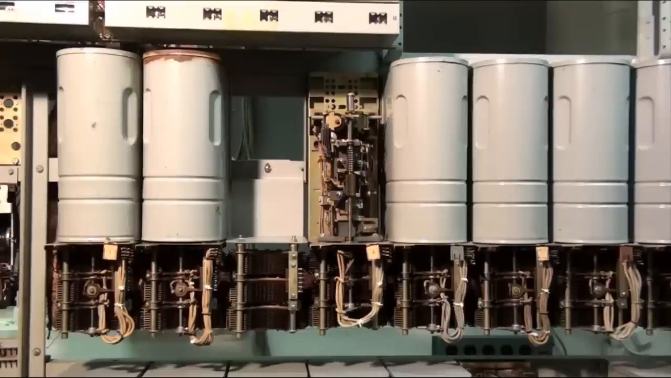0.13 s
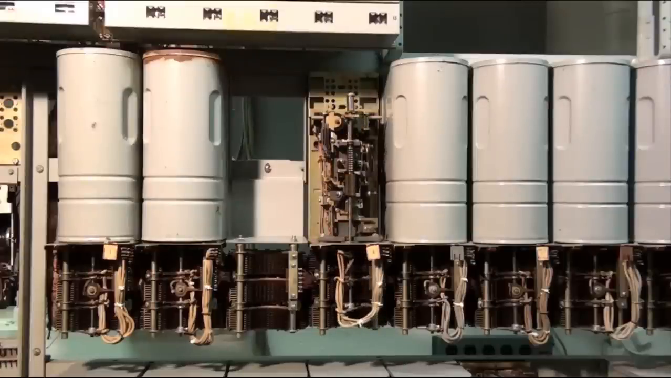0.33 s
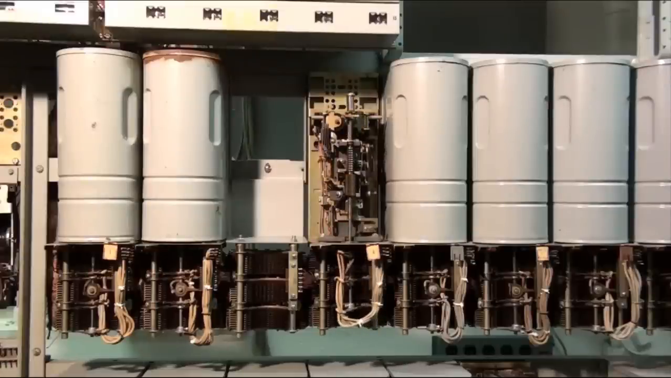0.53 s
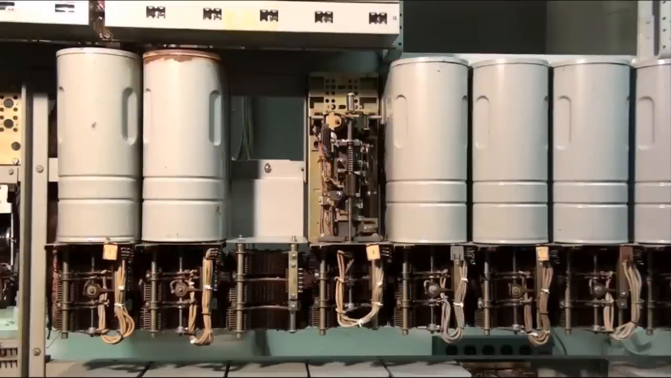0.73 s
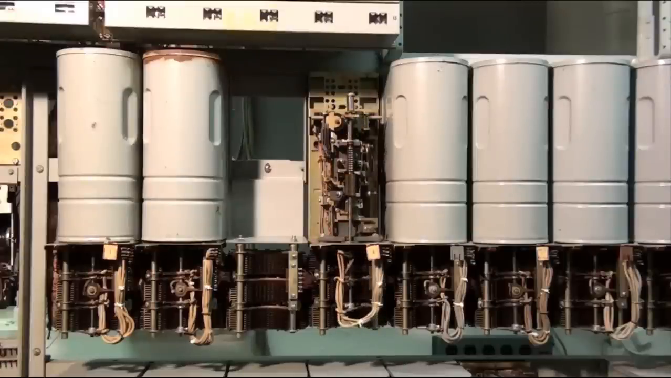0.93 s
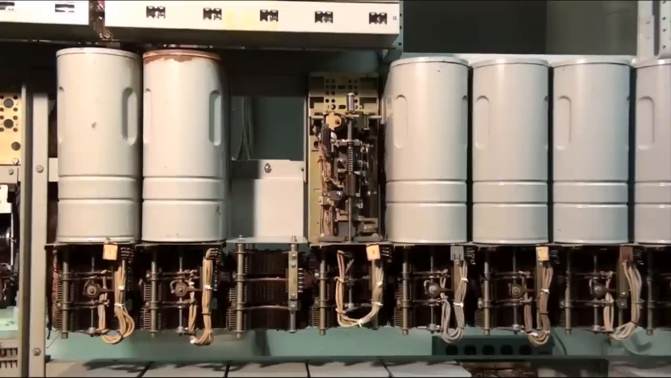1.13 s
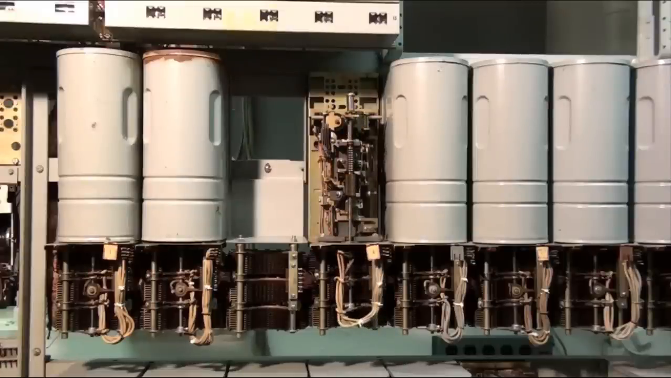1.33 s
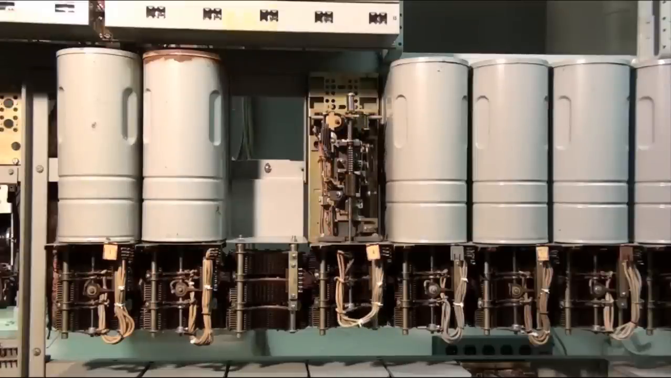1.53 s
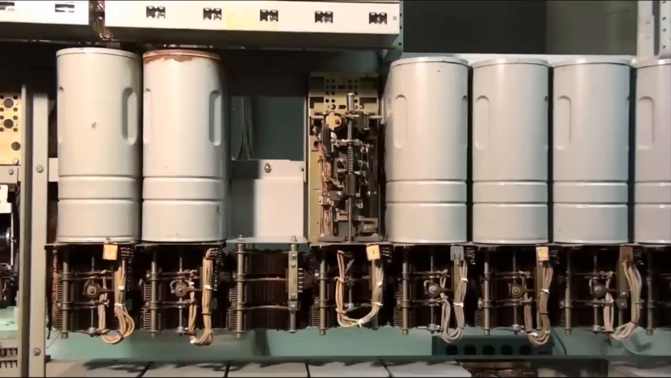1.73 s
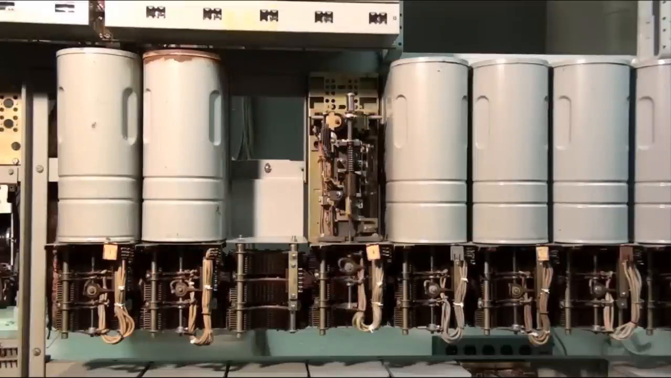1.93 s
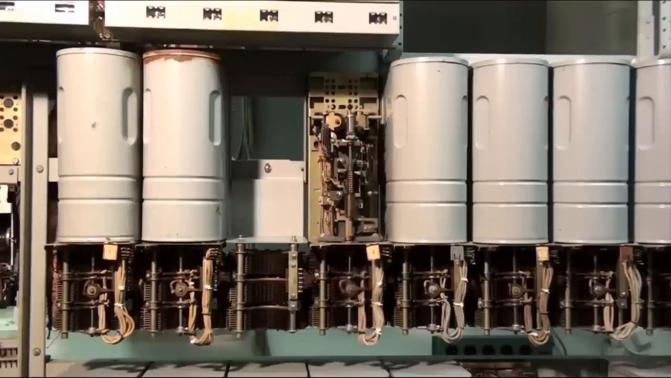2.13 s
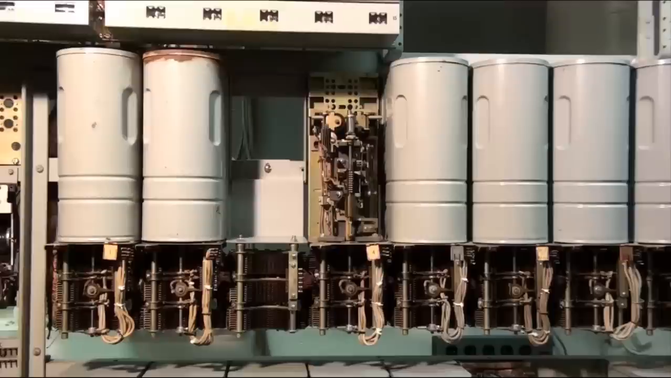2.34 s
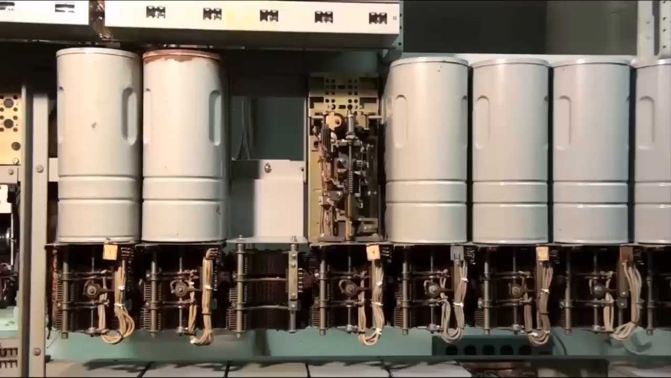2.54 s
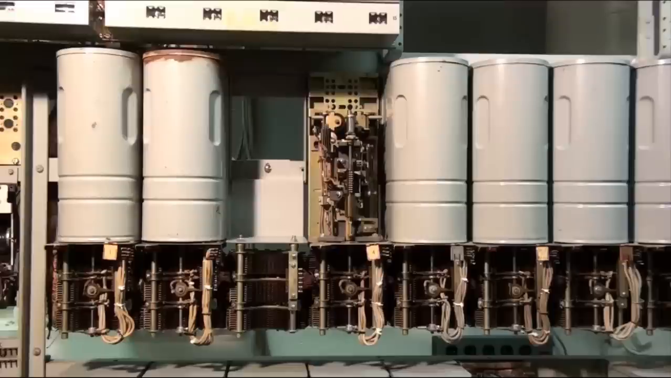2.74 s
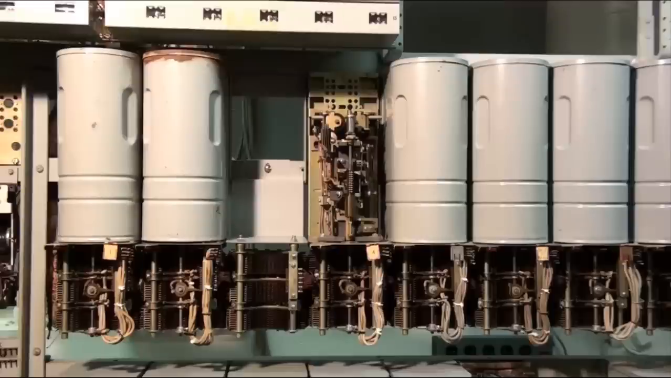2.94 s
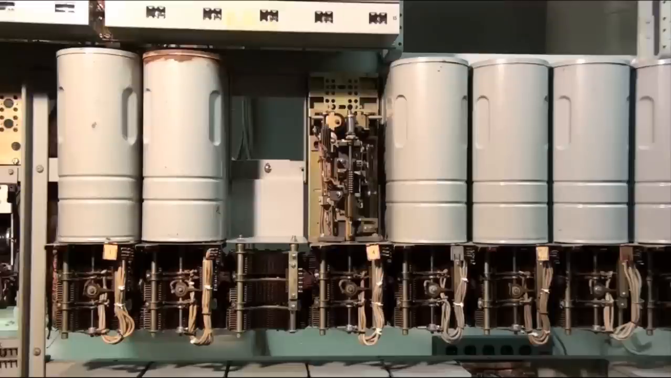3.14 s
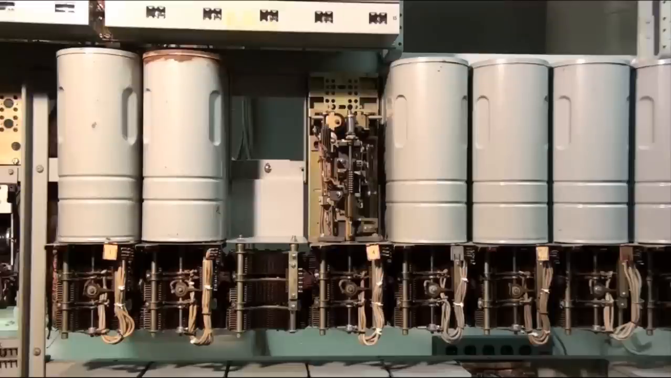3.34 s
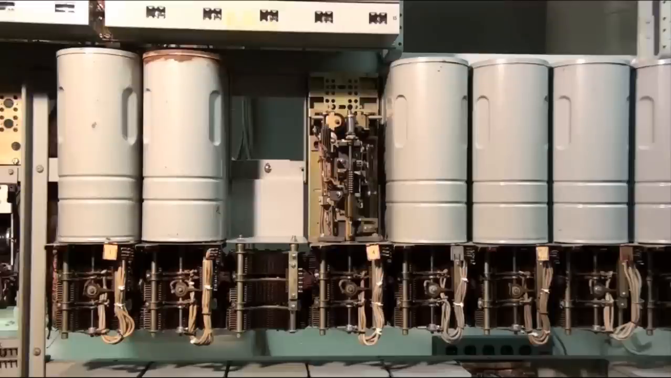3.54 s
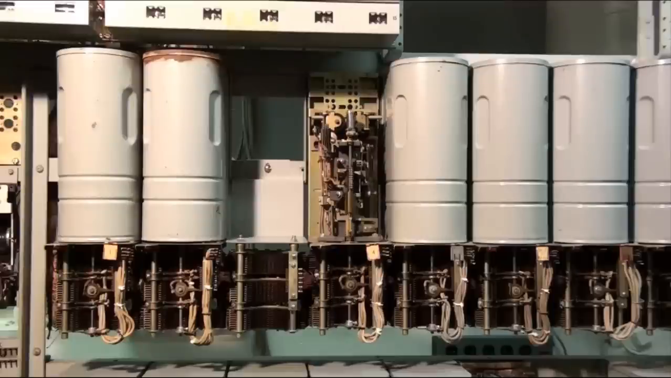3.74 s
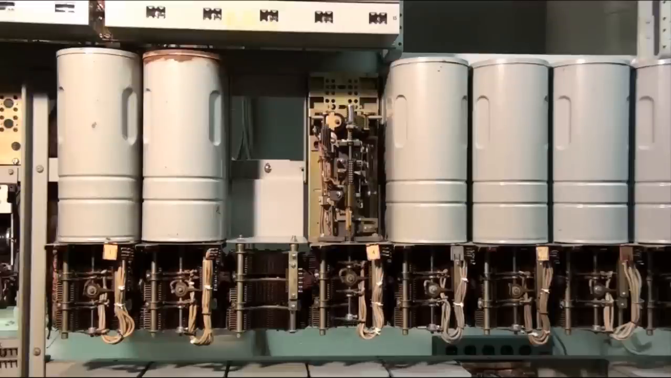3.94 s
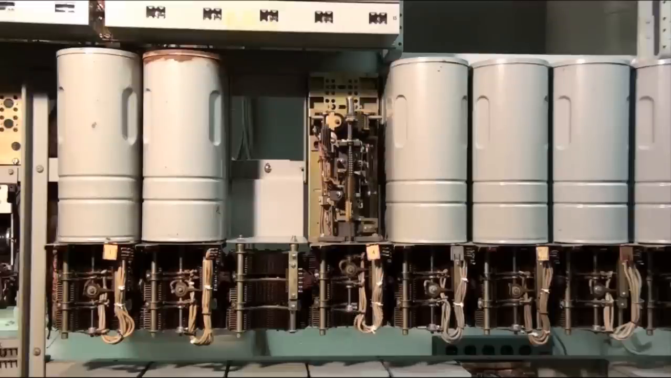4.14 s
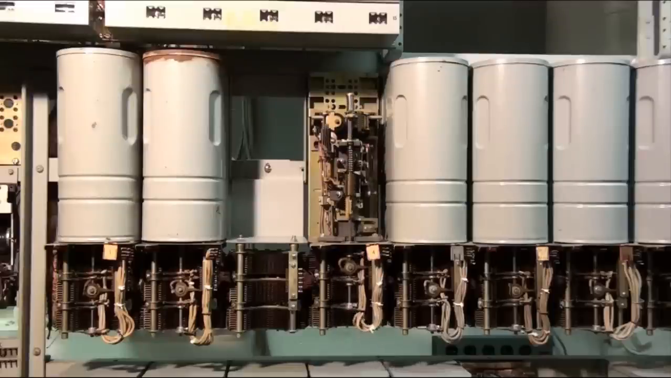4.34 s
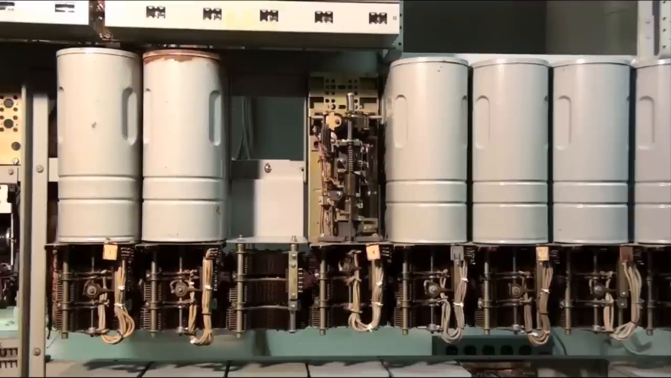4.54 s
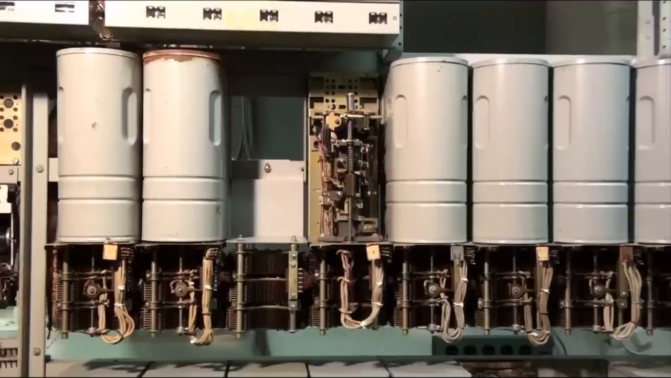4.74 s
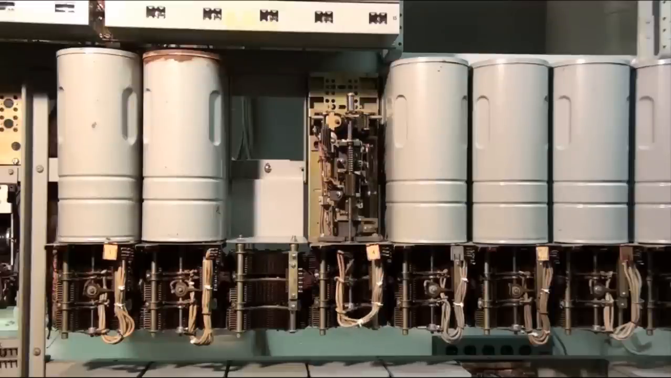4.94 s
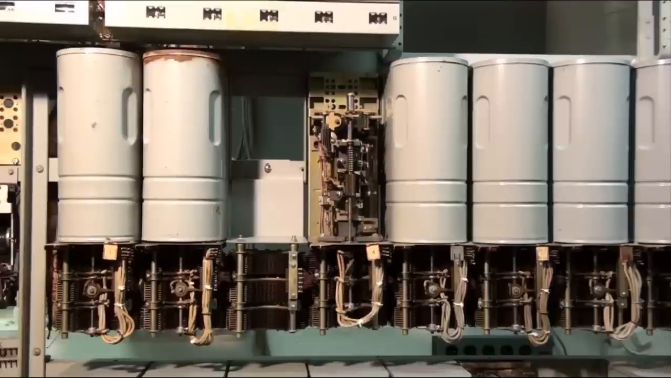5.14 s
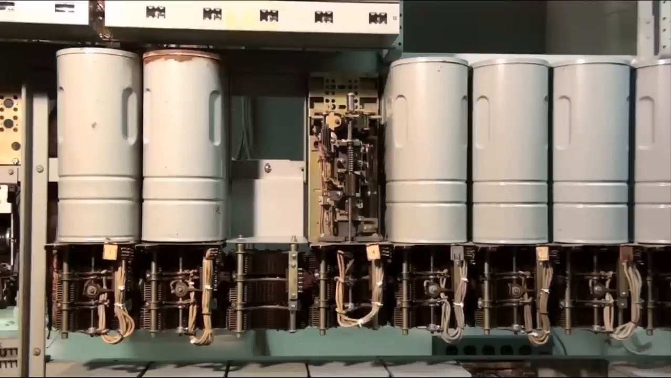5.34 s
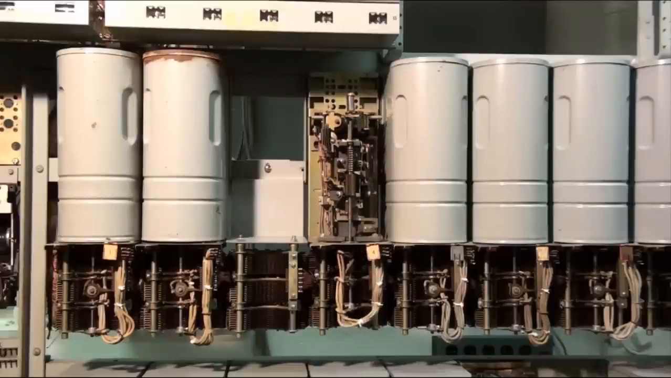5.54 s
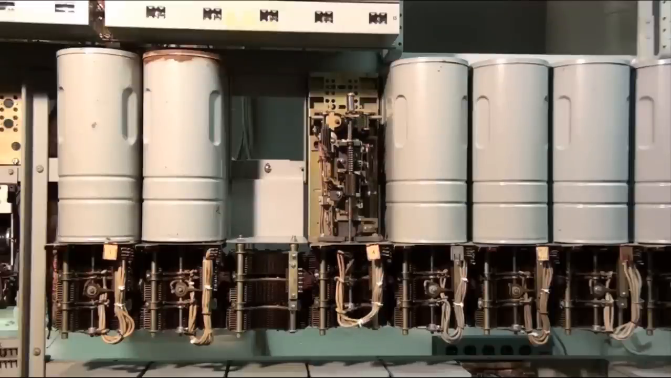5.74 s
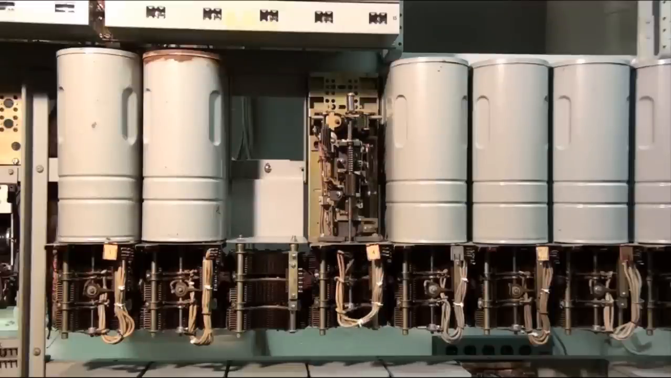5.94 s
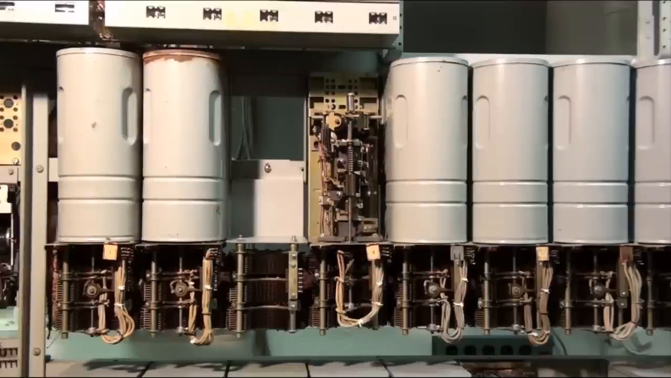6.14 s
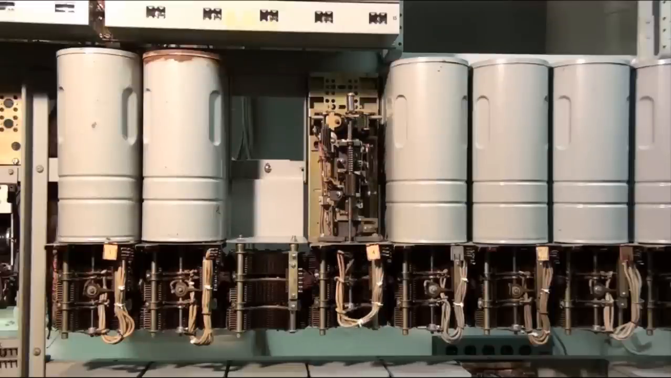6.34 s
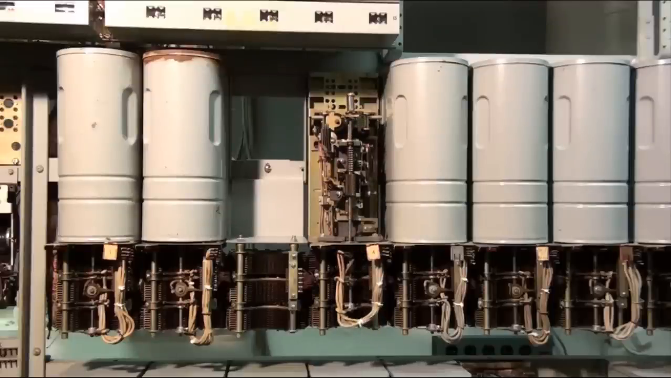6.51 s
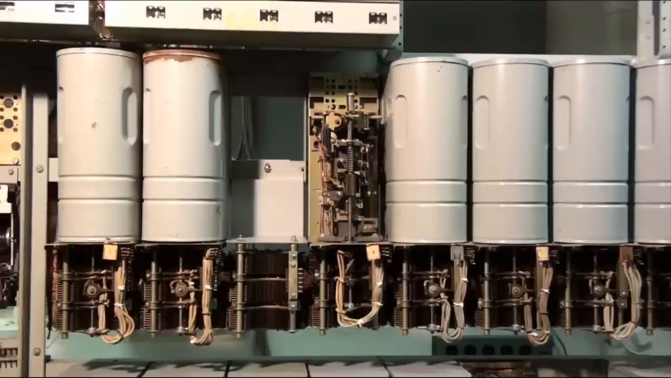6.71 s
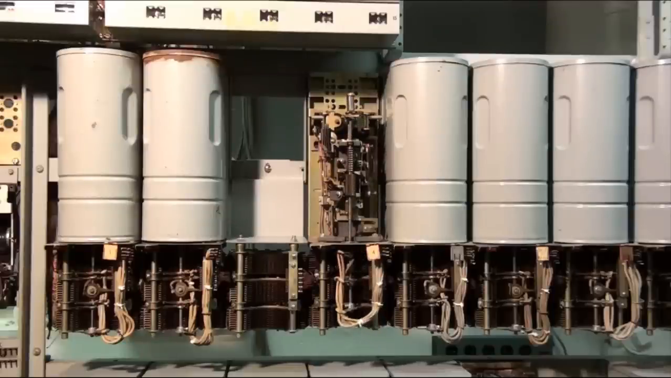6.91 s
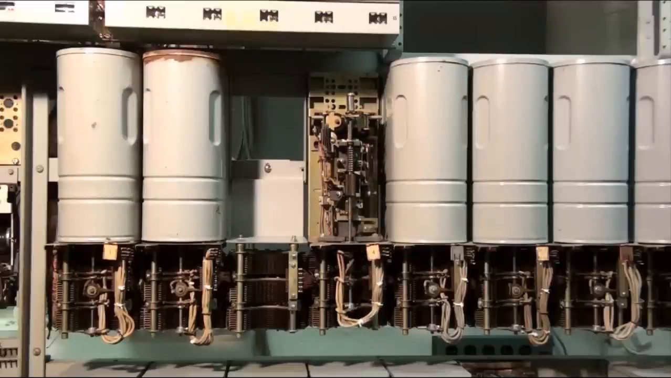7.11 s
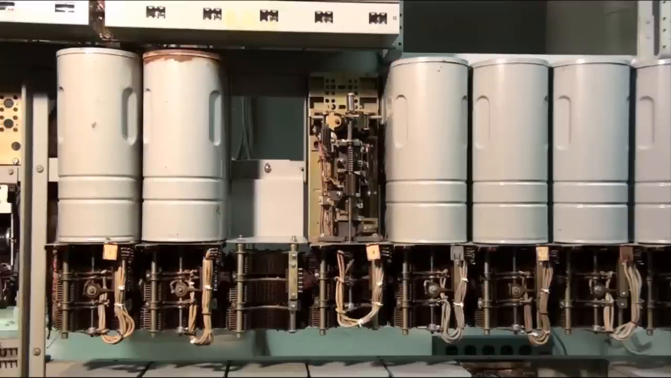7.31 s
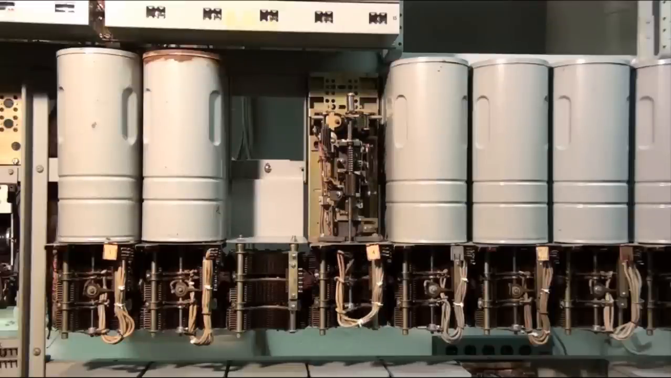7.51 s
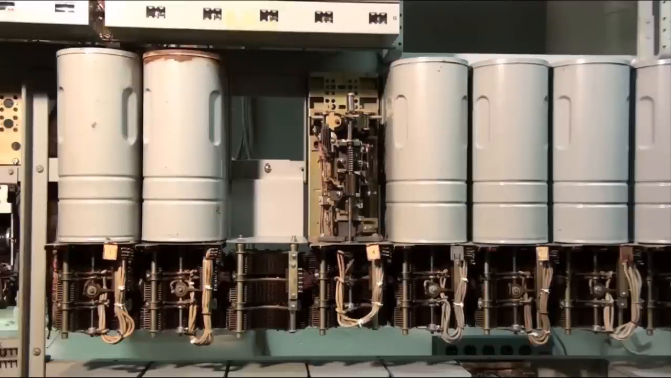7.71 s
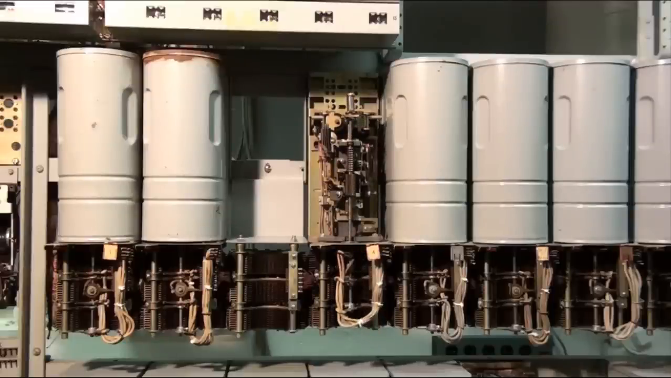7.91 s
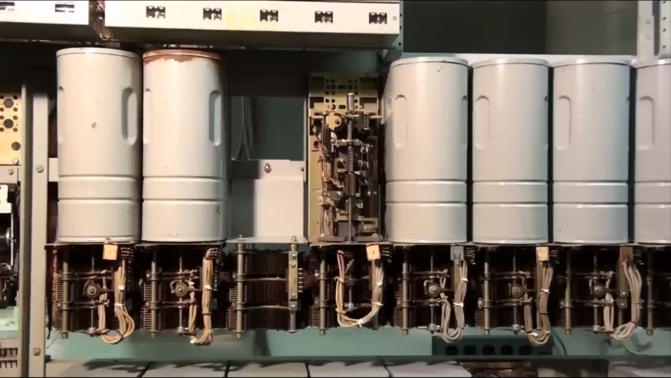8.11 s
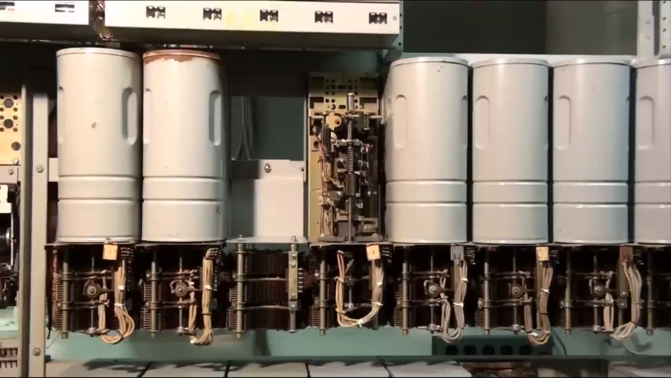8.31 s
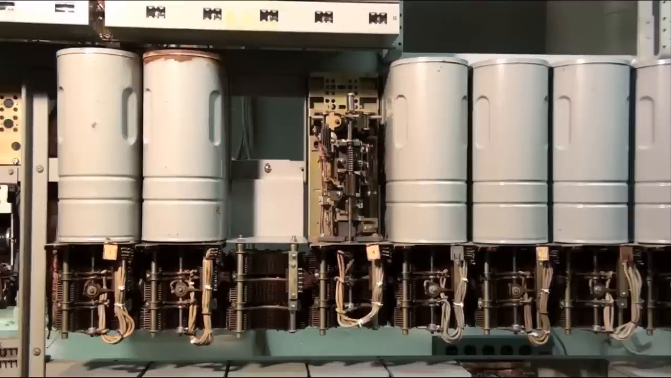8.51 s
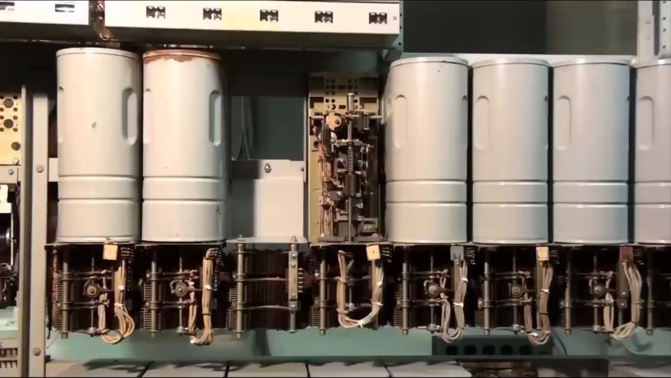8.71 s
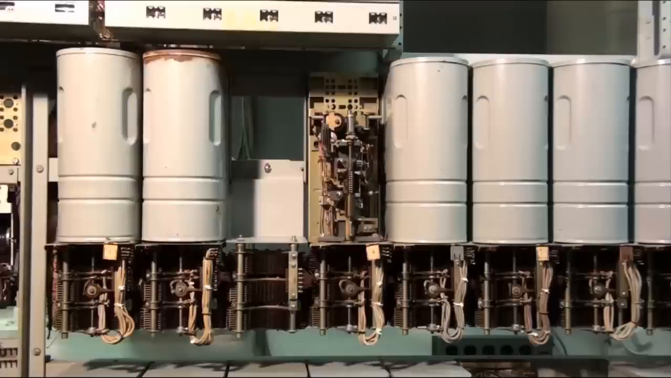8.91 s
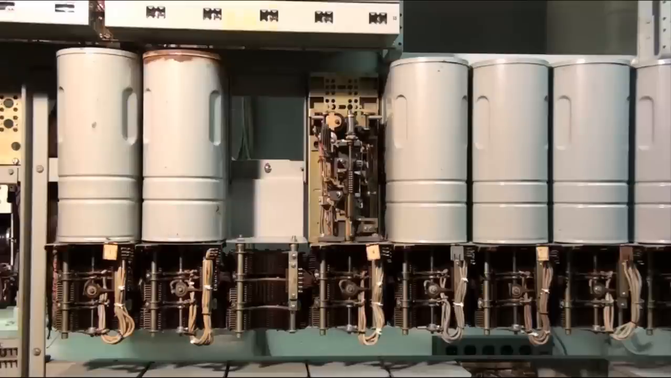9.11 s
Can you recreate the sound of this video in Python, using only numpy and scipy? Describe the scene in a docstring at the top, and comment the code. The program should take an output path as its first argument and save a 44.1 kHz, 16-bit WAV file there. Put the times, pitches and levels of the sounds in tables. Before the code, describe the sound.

Close in a humming equipment room, a relay clacks and a metal shaft swings back and drops with a rattle. After a pause of faint distant ticking, a loud machine-gun ratchet lifts in ten double strokes, then turns in ten quicker, brighter ones. Quiet follows, with scattered far relays, until soft hollow rack knocks, another relay clack and a second clattering release.

```python
"""An electromechanical telephone selector works close to the microphone in an equipment room.
A relay pulls in, the shaft swings home and drops; it then ratchets up, ratchets round, and is later released again.
Blows are bursts of coloured noise in bands plus decaying sine modes of the parts struck.
Throughout, relays in other racks tick over hum, a thin whine and ventilation noise; knocks on the rack come late.
The recorder's fast limiter flattens the loudest blows."""
import sys
import numpy as np
from scipy import signal
from scipy.fft import rfft, irfft
from scipy.io import wavfile
from scipy.ndimage import uniform_filter1d, minimum_filter1d

SR = 44100
rng = np.random.default_rng(int(sys.argv[2]) if len(sys.argv) > 2 else 0)


def to_wav(s):
    """Save 16-bit WAV."""
    ch = np.atleast_2d(s).T  # columns
    pcm = np.round(np.clip(ch, -1, 1) * 32767)  # PCM
    wavfile.write(sys.argv[1], SR, pcm.astype(np.int16))


N = 408366

# Blow rows everywhere: (t/s, level/dB, clank = extra mid/dB, thud = extra bass/dB); levels are relative.
# shaft releases: (latch opens/s, swing ends/s, shaft lands/s)
RELEASES = [(1.8938, 1.952, 2.157), (8.7635, 8.8175, 8.985)]
# blows of a landing: (delay/s, level/dB, clank/dB, thud/dB)
LANDING_BLOWS = [(0, -15.5, 8, 6.9), (.024, -24, 4, 13.2), (0.0636, -18.5, -2, 7)]
# colour of single blows of the switch: (f/Hz, density/dB per Hz)
SWITCH_COLOUR = [(100, -44), (190, -6), (280, -4), (430, -2.5), (620, -7.5), (800, -4), (1100, -7),
                 (1500, -3.5), (2600, -5.5), (4800, -7), (7000, -3.5), (8800, -1), (11500, -11),
                 (16000, -20.5)]
# colour of contact clicks: (f/Hz, density/dB per Hz)
CONTACT_COLOUR = [(1000, -44), (8000, -31), (10500, -9), (13300, 9), (14800, 9), (16000, -15)]
# modes of the switch frame and its covers: (f/Hz, level/dB, t60/s)
FRAME_MODES = [(193.2, -16, 0.6), (365.3, -8, 0.78), (452, -8, .6), (560.5, -4, 0.62), (773, -4, 0.46),
               (843, -16.5, 0.64), (1404, -4, 0.46), (1554, -16, 0.72), (1622, -3, 0.52), (1844, 0, 0.1),
               (1920, 6, 0.14), (2060, -14, 0.12), (2188, 4, 0.26), (2630, 7, 0.092), (3214, -1, 0.39),
               (5700, -7, 0.2), (6200, -6, 0.27), (8100, -3, 0.22), (7843, -4, 0.2), (9700, -2, 0.2),
               (9000, 5, 0.107)]
# how rack and room carry a blow: (band centre/Hz, t60/s, build-up/s, crack over tail/dB)
BANDS = [(150, 1, 0.023, -3.5), (360, 0.6, 0.0079, -8.5), (660, 0.45, 0.0055, 5.5),
         (1320, 0.45, 0.0047, -5.5), (2830, 0.33, 0.0026, -0.5), (5060, 0.28, 0.0031, -0.5),
         (8700, 0.22, 0.00067, 10.5), (13900, .16, 0.006, 5.5)]
BAND_HZ = np.array(BANDS)[:, 0]
# stereo width of a blow: (f/Hz, side over mid/dB)
BLOW_WIDTH = [(60, -19), (110, -25), (200, -63), (380, -30), (700, -15.5), (1290, -9), (2380, -13.5),
              (4400, -8.5), (8120, -10), (10300, -12), (12500, -41)]


def lifting_steps():
    """The magnet's pawl lifts the shaft tooth by tooth; each stroke hits the frame, each pull rings the pawl."""
    # lifting steps: (magnet pulls/s, magnet lets go/s)
    step_times = [(3.759, 3.787), (3.814, 3.847), (3.875, 3.903), (3.931, 3.962), (3.989, 4.023),
                  (4.050, 4.081), (4.107, 4.142), (4.168, 4.197), (4.223, 4.256), (4.290, 4.323)]
    # blows of armature, pawl and ratchet per pull: (delay/s, level/dB, clank/dB, thud/dB)
    pull_blows = [(0, 0.5, 3, -6), (.009, 0, 3, -5.5), (.018, 0, -25, 0)]
    # the same per release: (delay/s, level/dB, clank/dB, thud/dB)
    release_blows = [(0, 0, 2.5, 2), (.009, -2, 0, -1.5)]
    # colour of a lifting blow: (f/Hz, density/dB per Hz)
    lift_colour = [(59, -64.5), (100, -36), (234, 2.5), (289, -15.5), (452, 0), (492, -7), (752, -7),
                   (1100, -11), (1870, -3), (2370, -5.5), (3190, -4.5), (4110, -7), (8280, -1.5),
                   (11600, -10), (16000, -12.5)]
    # pawl modes: (f/Hz, level/dB, t60/s)
    pawl_modes = [(1894, -8, 0.18), (1904, -9, 0.16), (2110, -10, .2)]
    first_step_db, growth_db_per_s = -20, 3  # steps grow harder as the shaft climbs
    first_pull_s = step_times[0][0]
    steps = [(pull_s, release_s, first_step_db + growth_db_per_s * (pull_s - first_pull_s))
             for pull_s, release_s in step_times]
    rows = strokes(steps, pull_blows, release_blows)
    impacts = blows(rows, lift_colour, BLOW_WIDTH, near_db=-1.5, crack_s=.0024, count=5)
    frame = gain_of(-21) * ring(rows, FRAME_MODES, rise_s=.0078)
    pawl = ring([(pull_s, db, 0, 0) for pull_s, _, db in steps], pawl_modes, rise_s=.002)
    return impacts + frame + pawl


def turning_steps():
    """The shaft steps round; blows ring frame and ratchet hub, and an interrupter contact clicks at each release."""
    # turning steps across the contact bank: (magnet pulls/s, magnet lets go/s, level/dB)
    steps = [(4.456, 4.486, -16), (4.516, 4.5383, -18), (4.567, 4.587, -15), (4.618, 4.642, -15.5),
             (4.674, 4.693, -11), (4.729, 4.7486, -14), (4.784, 4.804, -17.5), (4.836, 4.855, -16),
             (4.890, 4.915, -18.5), (4.949, 4.988, -16.5)]
    # blows of armature, pawl and ratchet per pull: (delay/s, level/dB, clank/dB, thud/dB)
    pull_blows = [(-.013, -9, 9, 0.5), (0, -2, 2, 4.5), (.005, -6.5, -12, -11)]
    # the same per release: (delay/s, level/dB, clank/dB, thud/dB)
    release_blows = [(.004, 1.5, -2.5, -6)]
    # colour of a turning blow: (f/Hz, density/dB per Hz)
    turn_colour = [(59, -67), (100, -50.5), (189, 3), (283, -6.5), (608, -7), (768, -6), (910, -12),
                   (1580, -1), (2420, -7), (3860, -4), (4980, -4.5), (8460, 1), (11200, -9.5),
                   (14100, -8.5), (16000, -26)]
    # ratchet hub modes: (f/Hz, level/dB, t60/s)
    hub_modes = [(193, -11.5, 0.1), (1650, -4.5, 0.068), (1908, -6.5, 0.13), (6100, -12, 0.058)]
    rows = strokes(steps, pull_blows, release_blows)
    impacts = blows(rows, turn_colour, BLOW_WIDTH, near_db=2.5, crack_s=.0041, count=4)
    frame = gain_of(-21.5) * ring(rows, FRAME_MODES, rise_s=.005)
    hub = ring([(pull_s, db, 0, 0) for pull_s, _, db in steps], hub_modes, rise_s=.0059)
    clicks = [(release_s, db, 0, 0) for _, release_s, db in steps]
    contact = blows(clicks, CONTACT_COLOUR, BLOW_WIDTH, near_db=18, crack_s=.001, count=2)
    return impacts + frame + hub + gain_of(-18.5) * contact


def switch_blows():
    """Relay closings, shaft landings, control relays and the final shudder strike the switch and ring its frame."""
    # a relay closes before each release: (t/s, level/dB)
    closings = [(1.480, -14.5), (8.348, -14.5)]
    # contacts touch, armature seats and rebounds: (delay/s, level/dB, clank/dB, thud/dB)
    closing_blows = [(-.016, -18.5, -9, -14), (-.008, -7, -10, -8), (0, -2, 2, -2), (.0085, -8.5, 3, -6),
                     (.014, -14.5, -5, 14)]
    # relays that start and stop the stepping: (t/s, level/dB, clank/dB, thud/dB)
    control_relays = [(3.752, -27, 3, -9), (4.434, -30, -6, -10), (4.438, -15.5, -1, -4),
                      (4.467, -20, -2, -14), (4.971, -21, 1, -3)]
    # modes of the closing relay: (f/Hz, level/dB, t60/s)
    relay_modes = [(204.4, -18, 0.43), (564, -30, .25), (805, -19, 0.32), (2400, -15.5, .2),
                   (2720, -13, 0.21), (3840, -10.5, 0.14), (4050, -10, 0.17), (7870, 0, .1),
                   (8811, 2, 0.094), (9620, 2, 0.085)]
    settling = bounces(5.010, -35, gap_s=.06, shrink=.76, loss_db=.95, clank_db=9.5, thud_db=20.5, count=4)
    landings = repeated([(land_s, 0) for _, _, land_s in RELEASES], LANDING_BLOWS)
    rows = repeated(closings, closing_blows) + landings + control_relays + settling
    impacts = blows(rows, SWITCH_COLOUR, BLOW_WIDTH, near_db=-1, crack_s=.00098, count=5)
    frame = gain_of(-22) * ring(rows, FRAME_MODES, rise_s=.014)
    relay = ring([(s, db, 0, 0) for s, db in closings], relay_modes, rise_s=.004)
    return impacts + frame + relay


def swinging_shaft():
    """The latch opens and the shaft swings home against its stop, which sets the wipers ringing."""
    # latch blows: (delay/s, level/dB, clank/dB, thud/dB)
    unlatch_blows = [(0, -17, 1, -7), (0.0133, -9, -8, -3)]
    # blows around the stop: (delay/s, level/dB, clank/dB, thud/dB)
    stop_blows = [(-.021, -28, 13.5, 17), (0, -9, -5, 1.5)]
    # colour of these blows: (f/Hz, density/dB per Hz)
    swing_colour = [(100, -45), (190, -5), (280, -4), (430, -5), (620, -5), (800, -4.5), (1100, -7.5),
                    (1500, -3.5), (2600, -6), (4800, -8), (6500, -9), (8000, 0), (9300, 0), (10500, -2.5),
                    (11800, -11.5), (16000, -20)]
    # wiper modes: (f/Hz, level/dB, t60/s)
    wiper_modes = [(9560, -23, .26), (10150, -22, 0.3), (10600, -22, 0.28), (11050, -26, .22)]
    rows = []
    for open_s, home_s, _ in RELEASES:
        rows += repeated([(open_s, 0)], unlatch_blows) + repeated([(home_s, 0)], stop_blows)
    impacts = blows(rows, swing_colour, BLOW_WIDTH, near_db=-1, crack_s=.0011, count=4)
    frame = gain_of(-20) * ring(rows, FRAME_MODES, rise_s=.014)
    wipers = ring([(home_s, 0, 0, 0) for _, home_s, _ in RELEASES], wiper_modes, rise_s=.003)
    return impacts + frame + gain_of(-3) * wipers


def falling_shaft(contact_db=-34):
    """The shaft ticks its guide, rings as it lands and rattles; contacts click at the tick and the rebound."""
    # guide modes, rung by the tick: (f/Hz, level/dB, t60/s)
    guide_modes = [(5300, 1, 0.077), (5900, -2.5, 0.065), (6330, 1, .07)]
    # shaft modes, rung by the landing: (f/Hz, level/dB, t60/s)
    shaft_modes = [(369, -29, .5), (798, -27.5, 0.34), (1450, -27, 0.44), (1580, -26, 0.61),
                   (2250, -20, .16), (3800, -26.5, .15)]
    tick_lead_s, tick_db = .0775, -20
    rattle_delay_s, rattle_db, rattle_back_db = .168, -37, -12.5
    landings_s = [land_s for _, _, land_s in RELEASES]
    ticks = [(land_s - tick_lead_s, tick_db, -1.5, 1) for land_s in landings_s]
    rebound_s = LANDING_BLOWS[-1][0]
    clicks = [(land_s + delay_s, contact_db, 0, 0) for land_s in landings_s for delay_s in (-tick_lead_s, rebound_s)]
    rattle = []
    for land_s in landings_s:
        taps = bounces(land_s + rattle_delay_s, rattle_db, gap_s=.051, shrink=.875, loss_db=.3,
                       clank_db=5.5, thud_db=3, count=8)
        # a softer tap on each way back
        back_taps = [((a[0] + b[0]) / 2, a[1] + rattle_back_db, *a[2:]) for a, b in zip(taps, taps[1:])]
        rattle += taps + back_taps
    tick = blows(ticks, SWITCH_COLOUR, BLOW_WIDTH, near_db=-4.5, crack_s=.0027, count=2)
    guide = ring(ticks, guide_modes, rise_s=.0025)
    shaft = ring([(land_s, 0, 0, 0) for land_s in landings_s], shaft_modes, rise_s=.0035)
    contacts = blows(clicks, CONTACT_COLOUR, BLOW_WIDTH, near_db=7, crack_s=.002, count=1)
    rattling = blows(rattle, SWITCH_COLOUR, BLOW_WIDTH, near_db=0, crack_s=.0016, count=3)
    return tick + guide + shaft + contacts + rattling


def scraped_spring(glide=.04):
    """A spring scraped by the shaft: a sine swells and fades within milliseconds, its pitch rising by the glide."""
    # scrapes: (t/s, length/s, f/Hz, level before a common gain/dB)
    scrapes = [(1.931, .014, 1400, -18), (4.974, .014, 1400, -25), (8.799, .014, 1410, -17)]
    out = np.zeros((2, N))
    for s, length_s, hz, db in scrapes:
        u = np.linspace(0, 1, round(length_s * SR))
        turns = np.cumsum(hz * (1 + glide * (u - .5))) / SR
        swell = np.sin(np.pi * u ** 1.5)
        add(out, s, gain_of(db + 6) * swell * np.sin(2 * np.pi * turns))
    return out


def rack_knocks():
    """Hollow knocks on the rack ring a panel."""
    # knocks: (t/s, level/dB, clank/dB, thud/dB)
    rows = [(8.130, -35.5, 1, 0), (8.160, -33, -1.5, -1), (8.182, -33.5, 0, 1), (8.614, -23.5, 2, -1.1),
            (8.634, -42, -9, -1.7)]
    # knock colour: (f/Hz, density/dB per Hz)
    knock_colour = [(30, -13), (75, -29), (213, -3), (503, -10.5), (630, -0.5), (698, -12), (1070, -12),
                    (1160, -22), (1240, -14), (1940, -18.5), (4880, -28), (9020, -36.5), (14700, -52)]
    # panel modes: (f/Hz, level/dB, t60/s)
    panel_modes = [(550, -13, .14), (648, -5, 0.17), (780, -13, .11)]
    impacts = blows(rows, knock_colour, BLOW_WIDTH, near_db=-4.5, crack_s=.039, count=2)
    return impacts + ring(rows, panel_modes, rise_s=.004)


def far_racks():
    """Each far relay works the next in a short chain; all ring their mounting plates, a few leave springs ringing."""
    # first relay of each chain: (t/s, level/dB, clank/dB, thud/dB, gap within the chain/s)
    far_relays = [(.160, -35, -1.5, -2.5, 0.11), (.810, -59, 7, 14.5, 0.066), (1.032, -35, 7.5, -10.5, 0.2),
                  (1.142, -30, 1.5, 2, 0.14), (1.660, -33.5, 1, -7, .18), (2.665, -40, 1.5, -1.5, .06),
                  (2.695, -39, 0, 1.5, 0.11), (3.130, -36.5, -0.5, 0.5, 0.15),
                  (3.586, -39.5, 2.5, -3, 0.11), (3.607, -25.5, -3, -9, 0.14), (5.300, -42.5, -6, 0, .1),
                  (5.683, -37, -2.5, -1, 0.075), (6.158, -36, 0, -1, 0.11), (6.810, -63, 0, 18.5, 0.072),
                  (7.135, -33, 0.5, 2, .146), (7.640, -45, -0.5, 0.5, 0.094),
                  (7.705, -45.5, 12.5, 12, .155), (8.025, -53.5, 10, 13, .06), (8.527, -33, 3, -4.5, .1)]
    # softer, duller followers: (gaps after the first, level/dB, clank/dB, thud/dB)
    chain = [(0, 0, 0, 0), (1, -11, -2, -2), (2.1, -28, 7, 19.5)]
    # far relay colour: (f/Hz, density/dB per Hz)
    far_colour = [(120, -43.5), (220, -9), (330, -12.5), (470, -5), (560, -5), (720, -11.5), (1050, -24.5),
                  (1900, -20), (2400, -25), (3100, -23.5), (4300, -29), (7200, -23.5), (9500, -29.5),
                  (12000, -40), (16000, -43)]
    # mounting plate modes: (f/Hz, level/dB, t60/s)
    plate_modes = [(451, -3.5, 0.15), (528, -15, 0.21), (1782, -9.5, 0.093), (2070, -19, 0.15),
                   (2960, -15, 0.17)]
    rows = [(s + gaps * gap_s, level + db, clank + more_clank, thud + more_thud)
            for s, level, clank, thud, gap_s in far_relays for gaps, db, more_clank, more_thud in chain]
    impacts = blows(rows, far_colour, BLOW_WIDTH, near_db=-20, crack_s=.0021, count=4)
    return impacts + ring(rows, plate_modes, rise_s=.008) + far_springs()


def far_springs(size=20000):
    """Single relay springs ring on as decaying sines."""
    # spring tones: (t/s, f/Hz, level/dB, t60/s)
    tones = [(1.034, 3570, -41.5, 0.23), (3.609, 2490, -40, .18), (3.613, 2650, -39, 0.22),
             (3.611, 2900, -43, .14), (3.609, 3110, -41, 0.18)]
    t, out = np.arange(size) / SR, np.zeros((2, N))
    for s, hz, db, t60 in tones:
        envelope = 1000 ** (-t / t60) * (1 - np.exp(-t / .002))
        add(out, s, gain_of(db) * envelope * np.sin(2 * np.pi * hz * t))
    return out


def room(air_db=-48, whine_hz=1319, whine_db=-68):
    """Ventilation noise, power hum wavering as narrow noise bands, and a thin whine of drifting phase."""
    # ventilation colour: (f/Hz, density/dB per Hz)
    air_colour = [(15, -62), (25, -26), (117, -2.5), (200, -16), (236, -12.5), (326, -25.5), (363, -15.5),
                  (451, -23), (531, -17.5), (575, -30.5), (624, -21), (1290, -31), (2410, -35.5),
                  (10700, -36.5), (16000, -47.5)]
    # stereo width of the ventilation: (f/Hz, side over mid/dB)
    room_width = [(60, -21), (110, -27), (200, -10.5), (380, -4.5), (700, -3), (1290, 1.5), (2380, -0.5),
                  (4400, -3.5), (8120, -3.5), (15000, -27)]
    # hum bands: (f/Hz, rms level/dB, width/Hz)
    hum_bands = [(97.5, -64.5, 5.8), (118.7, -57.5, 3.3), (235.5, -62.5, 11), (357.5, -63.5, 2.4),
                 (619, -69, 7), (824, -71.5, 2.5), (5650, -74.5, 180)]
    hz = np.fft.rfftfreq(N, 1 / SR)
    hum_shape = np.zeros(len(hz))
    for f, db, width_hz in hum_bands:
        to_unit_rms = np.sqrt(SR / (2 * np.sqrt(np.pi) * width_hz))
        hum_shape += gain_of(db) * np.exp(-.5 * ((hz - f) / width_hz) ** 2) * to_unit_rms
    hum = irfft(rfft(rng.standard_normal(N)) * hum_shape, N)
    drift = np.cumsum(.0095 * rng.standard_normal(N))
    whine = gain_of(whine_db) * evened(np.sin(2 * np.pi * whine_hz * np.arange(N) / SR + drift))
    return gain_of(air_db) * noise(air_colour, room_width, N) + hum + whine


def strokes(steps, pull, release, late_s=.0007, uneven_db=1.8):
    """Each step repeats the same blows, a little unevenly, as the magnet pulls and lets go."""
    rows = []
    for pull_s, release_s, level in steps:
        rows += repeated([(pull_s, level)], pull) + repeated([(release_s, level)], release)
    rows = np.array(rows)
    return rows + rng.standard_normal(rows.shape) * [late_s, uneven_db, uneven_db, uneven_db]


def repeated(events, pattern):
    """Plays the same pattern of blows at each (t/s, level/dB)."""
    return [(at + delay, level + db, clank, thud) for at, level in events for delay, db, clank, thud in pattern]


def bounces(start_s, level_db, gap_s, shrink, loss_db, clank_db, thud_db, count):
    """A loose part bounces, each time sooner; it holds its strength at first, then dies quickly."""
    times = start_s + np.concatenate([[0], np.cumsum(gap_s * shrink ** np.arange(count - 1))])
    return [(s, level_db - k ** 2 * loss_db, clank_db, thud_db) for k, s in enumerate(times)]


def blows(rows, colour, width, near_db, crack_s, count):
    """A few parts are struck in turn; clank and thud weight the bands of each blow."""
    parts = [response(colour, width, near_db, crack_s) for _ in range(count)]
    out = np.zeros((2, N))
    for k, (s, db, clank_db, thud_db) in enumerate(rows):
        band_gains = gain_of(db + heft(clank_db, thud_db, BAND_HZ))
        add(out, s, np.tensordot(band_gains, parts[k % count], 1))
    return out


def response(colour, width, near_db, crack_s, size=32768):
    """What one struck part sends out, per band: a crack, then a tail that builds up and dies."""
    early_side_db, late_side_db, spread_s = -4.5, 3.5, .026  # narrow at first, wider as the room answers
    t, hz = np.arange(size) / SR, np.fft.rfftfreq(size, 1 / SR)
    spectrum = rfft(noise(colour, width, size, ripple_db=3.5))
    bands = []
    for own, (_, t60, build_s, crack_db) in zip(np.eye(len(BANDS)), BANDS):
        share = read(np.transpose([BAND_HZ, own]), hz)  # triangular crossover
        tail = (1 - np.exp(-t / build_s)) * 1000 ** (-t / t60) * np.sqrt(.2 / t60)
        crack = gain_of(crack_db + near_db) * np.exp(-t / crack_s)
        bands.append(irfft(spectrum * share, size) * (crack + tail))
    bands = np.array(bands)
    centre = bands.mean(1, keepdims=True)
    side_db = late_side_db + (early_side_db - late_side_db) * np.exp(-t / spread_s)
    return centre + (bands - centre) * gain_of(side_db)


def ring(rows, body, rise_s, size=24000):
    """Every blow rings the modes of a body, with random phases and the blow's own clank and thud."""
    hz, mode_db, t60 = np.transpose(body)
    t, out = np.arange(size) / SR, np.zeros((2, N))
    modes = np.exp((2j * np.pi * hz - np.log(1000) / t60)[:, None] * t) * (1 - np.exp(-t / rise_s))
    for (s, db, clank_db, thud_db), turns in zip(rows, rng.random((len(rows), len(hz)))):
        gains = gain_of(db + mode_db + heft(clank_db, thud_db, hz))
        add(out, s, ((gains * np.exp(2j * np.pi * turns)) @ modes).real)
    return out


def heft(clank_db, thud_db, hz):
    """Extra dB of a blow: thud in the bass, clank in the middle range, none at the top."""
    return read([(600, thud_db), (1400, clank_db), (2600, clank_db), (7000, 0)], hz)


def noise(colour, width, size, ripple_db=0):
    """Stereo noise of a given colour and width; ripple gives it the random resonances of a small metal part."""
    hz = np.fft.rfftfreq(size, 1 / SR)
    knots = np.geomspace(900, SR / 2, 170)
    ripple = np.interp(hz, knots, np.clip(rng.standard_normal(len(knots)), -2, 2), left=0)
    mid, side = rfft(rng.standard_normal((2, size))) * gain_of(read(colour, hz) + ripple_db * ripple)
    side = side * gain_of(read(width, hz))
    return evened(irfft(np.array([mid + side, mid - side]), size))


def gain_of(db):
    """Decibels to amplitude."""
    return 10 ** (np.asarray(db) / 20)


def evened(x):
    """Scales to rms 1."""
    return x / np.sqrt(np.mean(x ** 2) + 1e-20)


def read(points, hz):
    """Reads a spectrum on a log-frequency axis."""
    f, value = np.transpose(points)
    return np.interp(np.log(hz + 1), np.log(f + 1), value)


def add(mix, s, sound):
    """Mixes a sound in at time s."""
    part = mix[:, round(s * SR):][:, :sound.shape[-1]]
    part += sound[..., :part.shape[1]]


def scene():
    """The near switch, slightly to the right, among the other racks."""
    stepping = lifting_steps() + turning_steps()
    near = stepping + switch_blows() + swinging_shaft() + falling_shaft() + scraped_spring()
    pan_db = [[-.3], [.3]]
    return near * gain_of(pan_db) + rack_knocks() + far_racks() + room()


def limiter(x, ceiling_db=-11, recovery_db_per_s=350, size=90):
    """Looks a moment ahead, ducks under each peak of short-term power and recovers quickly; size in samples."""
    power = uniform_filter1d((x ** 2).mean(0), size // 2)
    power_db = 10 * np.log10(abs(power) + 1e-12)
    peak_db = -minimum_filter1d(-power_db, 2 * size)
    over_db = np.maximum(peak_db - ceiling_db, 0)
    fall_db = np.arange(N) * recovery_db_per_s / SR
    duck_db = np.maximum.accumulate(over_db + fall_db) - fall_db
    return x / gain_of(uniform_filter1d(duck_db, size))


def record(dry, low_cut_hz=38, edge_hz=16200):
    """The limiter, a cut below the bass, then the band limit."""
    low_cut = signal.butter(2, low_cut_hz, "highpass", fs=SR, output="sos")
    low_pass = signal.firwin(511, edge_hz, window=("kaiser", 9), fs=SR)
    limited = signal.sosfilt(low_cut, limiter(dry))
    return signal.oaconvolve(limited, low_pass[None], "same")


dry = scene()
out = record(dry)
to_wav(out)
```